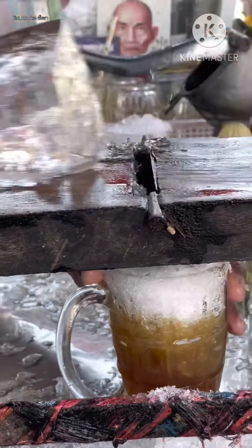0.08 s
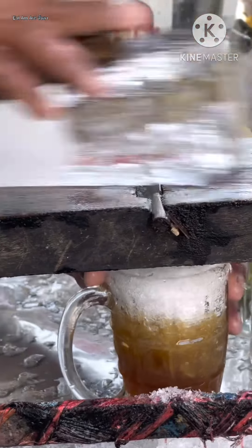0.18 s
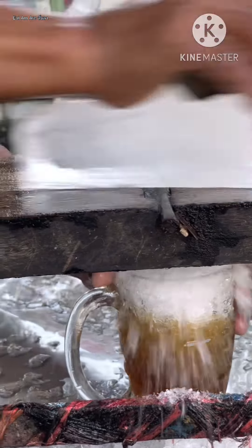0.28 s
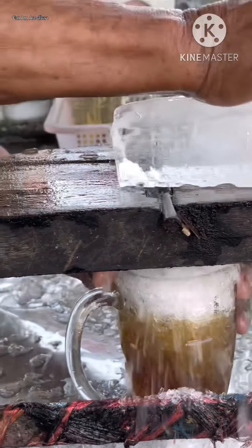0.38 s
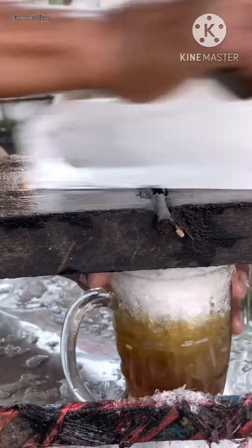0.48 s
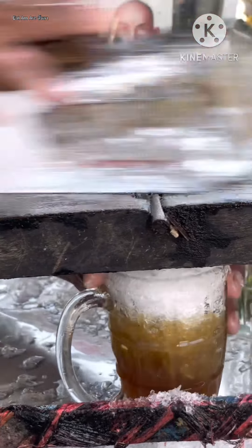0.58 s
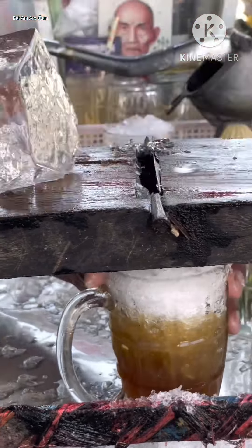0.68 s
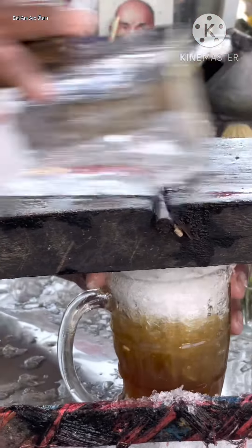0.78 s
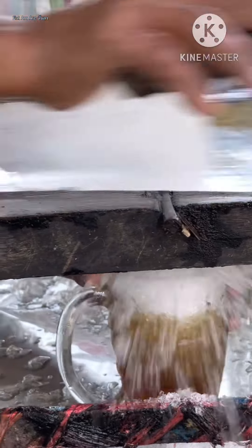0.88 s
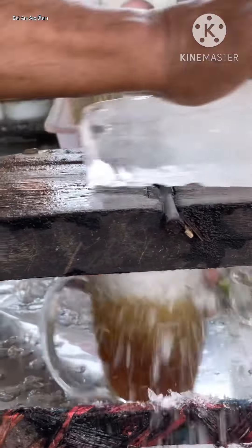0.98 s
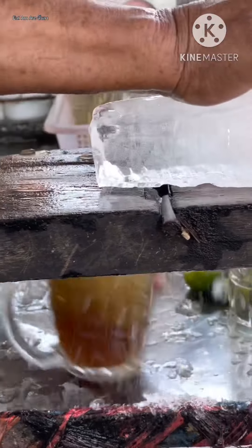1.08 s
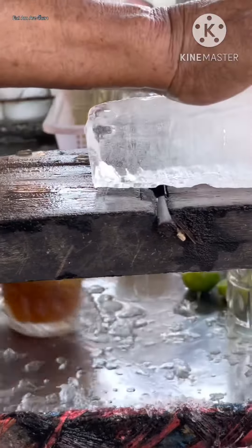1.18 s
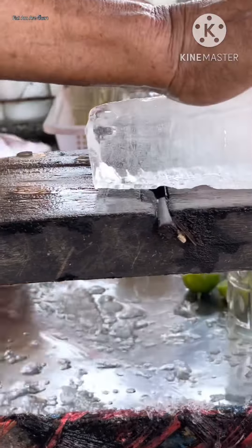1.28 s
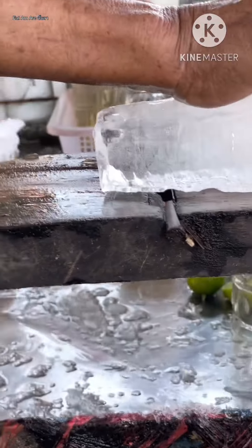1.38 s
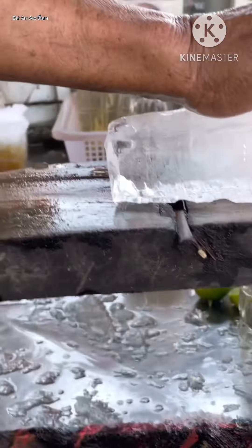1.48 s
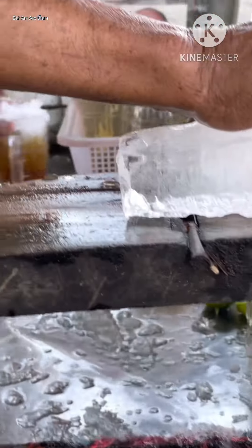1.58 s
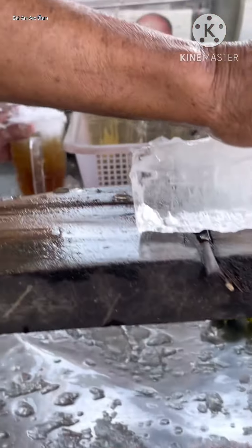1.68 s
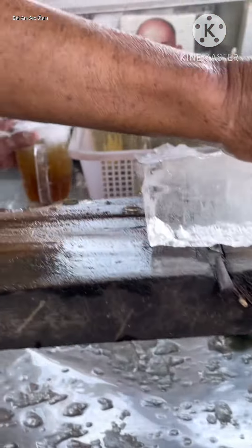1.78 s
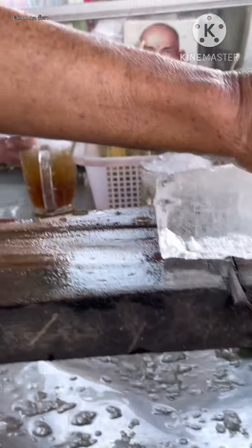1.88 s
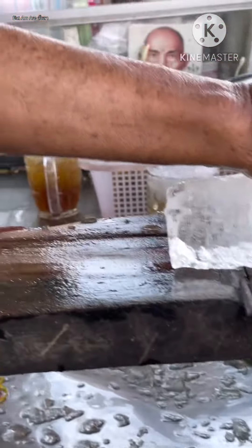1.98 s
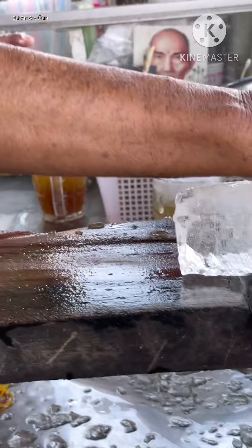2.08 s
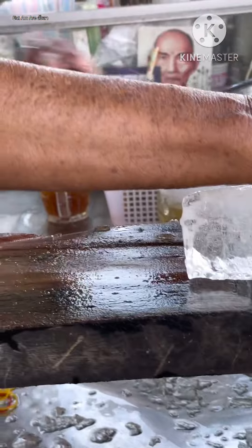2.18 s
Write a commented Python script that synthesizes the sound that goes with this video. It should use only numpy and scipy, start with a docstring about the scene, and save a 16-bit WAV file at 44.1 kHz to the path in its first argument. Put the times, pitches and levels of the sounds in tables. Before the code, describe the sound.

Ice crunches twice over a wooden shaver's blade, with light knocks and a low throb.

```python
"""Ice rubs and knocks lightly on a wet board, then crunches twice as the block is shoved over the blade
of a wooden shaver. Each cut is a dense spray of tiny fractures that ring board and blade; between and
after the cuts the block slides, ticks and knocks. Street stall, two closely spaced microphones close to
the shaver. Nearby, a low throb, probably a single-cylinder engine idling, over faint street noise."""
import sys
import numpy as np
from scipy import signal
from scipy.fft import rfft, irfft
from scipy.io import wavfile

SR = 44100
rng = np.random.default_rng(int(sys.argv[2]) if len(sys.argv) > 2 else 0)


def file_out(sig):
    """Save sig as 16-bit WAV at sys.argv[1]."""
    # one column per channel
    cols = np.atleast_2d(sig).T
    # limit, then scale
    lim = np.clip(cols, -1, 1)
    pcm = np.round(lim * 32767).astype(np.int16)
    wavfile.write(sys.argv[1], SR, pcm)


N = 97020
T = np.arange(N) / SR

# Strokes over the blade, close to the microphones: t/s, length/s, level/dB, sag/(dB/s), release/(dB/s)
STROKES = [(0.243, 0.212, -16.4, 47, 480), (0.870, 0.183, -15.4, 77, 225)]
# The block skips and the blade loses its grip: t/s, depth/dB
GRIP_SKIPS = [(0.9245, 7), (0.940, 10), (0.999, 4)]
# Larger chips breaking off: t/s, level/dB
ICE_CHIPS = [(0.2648, -11), (0.277, -19), (0.289, -17), (0.313, -14), (0.4685, -25), (0.870, -16.5),
             (0.891, -13), (0.900, -12), (0.914, -14), (0.9285, -11), (0.9475, -16.5), (0.971, -16.5),
             (0.980, -11.5), (1.026, -22), (1.0515, -18), (1.083, -34)]
# Spectra of the breaking ice and of the board under it: f/Hz, level/dB
CRUNCH_SPECTRUM = [(150, -24), (700, -15), (1400, -8), (2200, -6.5), (2800, -1.5), (3800, -4), (4500, -1.5),
                   (6000, 0), (7300, 1.5), (9000, -2), (12200, -6), (13600, -4), (14700, 0), (16000, -1)]
BOARD_SPECTRUM = [(40, -14), (80, -4), (450, -1), (720, -3), (1000, -1), (1500, -1), (2400, -4),
                  (3500, -14), (16000, -42)]
def cuts():
    """The blade bites and chatters through the ice as the push tires; chips fly and the board growls."""
    attack_s, bite_s, bite_db = .005, .024, 5.5
    board_db, board_follow = -18.3, .75  # the board follows the force less closely than the ice
    crunch, growl, touching = 0, 0, 0
    for start, length, db, sag, release in STROKES:
        age = np.maximum(T - start, 0)
        force_db = -bite_db * np.maximum(1 - age / bite_s, 0) - sag * np.maximum(age - bite_s, 0)
        contact = np.minimum(age / attack_s, 1) * amp(db - release * np.maximum(age - length, 0))
        touching += np.sqrt(contact / amp(db))
        crunch += contact * amp(force_db)
        growl += contact * amp(board_follow * force_db + board_db)
    slip_db = sum(db * np.exp(-((T - at) / .006) ** 2) for at, db in GRIP_SKIPS)
    chatter = amp(2.3 * walk(per_s=170) - slip_db)
    chips = sum(amp(db) * swell(at + .002, rise_s=.002, fall_s=.009) for at, db in ICE_CHIPS)
    ice = crunch * chatter * grains(6000, spread_db=2.3) + chips * grains(6000, spread_db=2.8)
    board = (growl * chatter + amp(-21) * chips) * grains(3000, spread_db=2.5)
    return shaver(ice, CRUNCH_SPECTRUM) + shaver(board, BOARD_SPECTRUM) + touching * passing_rings()


# Resonances along the stroke: peak t/s, 20 dB rise/s, 20 dB fall/s, f/Hz, width/Hz, level/dB
PASSING_RINGS = [(0.315, .12, .04, 2680, 260, -27.5), (0.325, .05, .07, 1570, 220, -29),
                 (0.41, .13, .12, 2080, 260, -34), (0.985, .1, .06, 1400, 120, -30),
                 (1.03, .16, .17, 3050, 480, -33.5)]
def passing_rings():
    """Board and blade ring more strongly at a few pitches while the block passes."""
    rings = 0
    for at, rise, fall, hz, width, db in PASSING_RINGS:
        ring = resonate_twice(grains(6000, spread_db=2.5), hz, 1.5 * width)
        rings += amp(db) * unit(ring) * swell(at, rise, fall)
    return rings


# Modes of board and blade: f/Hz, t60/s, level/dB relative to the bare contact
SHAVER_MODES = [(475, .05, -5), (947, .035, -2), (1420, .035, -1), (3244, .09, -2), (4600, .04, -5),
                (5870, .06, -1), (6820, .1, -1), (7220, .12, 3), (7710, .12, 1)]
def shaver(contact, spectrum):
    """A contact takes on a spectrum and rings board and blade, keeping its power."""
    bare = colour(spectrum)
    ringing = sum(amp(db) * resonate(bare, hz, np.log(1000) / np.pi / t60) for hz, t60, db in SHAVER_MODES)
    response = bare + ringing
    return through(contact, response / np.linalg.norm(response))


# The block gliding on meltwater: t/s, hiss level/dB, wood level/dB
WET_GLIDE = [(0, -54, -53), (0.18, -68, -58), (0.5, -57, -58), (0.66, -64, -57), (0.81, -66, -61),
             (1.14, -57, -57), (1.29, -68, -63), (1.52, -62, -63), (1.72, -70, -75), (2.05, -95, -86),
             (2.2, -84, -78)]
# Light rubs on the board: peak t/s, 20 dB rise/s, 20 dB fall/s, hiss level/dB, wood level/dB
BOARD_RUBS = [(0.033, .02, .04, -37, -43), (0.08, .05, .035, -33, -44), (0.129, .022, .035, -37, -40),
              (0.61, .035, .045, -54, -41), (0.64, .008, .03, -46, -57), (0.731, .06, .019, -33, -39),
              (1.333, .025, .06, -48, -46), (1.402, .015, .04, -64, -49), (1.467, .015, .03, -56, -56)]
# Spectrum of sliding frost: f/Hz, level/dB
FROST_SPECTRUM = [(300, -14), (2000, -5), (3000, -1), (4800, -5), (6000, 3), (6600, -4), (7300, 3),
                  (8000, -2), (10000, -2), (12500, -3.5), (15000, 1.5), (16000, 0)]
def rubs():
    """The block slides without cutting: frost hisses, wet ice squeaks and the wood grain rumbles."""
    rub_hiss, wood = 0, amp(curve(WET_GLIDE, column=2))
    for at, rise, fall, hiss_db, wood_db in BOARD_RUBS:
        shape = swell(at, rise, fall)
        rub_hiss += amp(hiss_db) * shape
        wood += amp(wood_db) * shape
    hiss = rub_hiss + amp(curve(WET_GLIDE))
    catch = amp(2.2 * walk(per_s=120))
    squeak = unit(resonate_twice(rng.standard_normal(N), hz=5920, stage_width_hz=600))
    frost = shaver(hiss * catch * grains(5000, spread_db=3.5), FROST_SPECTRUM)
    rumble = shaver(wood * catch * grains(2500, spread_db=3), BOARD_SPECTRUM)
    return amp(-12) * rub_hiss * catch * squeak + frost + rumble


# Splinters and drops at the shaver: t/s, level/dB; their spectrum: f/Hz, level/dB
SPLINTER_TICKS = [(0.190, -49), (0.611, -35), (0.683, -33), (0.695, -37), (0.837, -48), (1.1119, -32),
                  (1.3084, -32), (1.4536, -34), (1.4835, -43), (1.5529, -50), (1.812, -63), (1.922, -59),
                  (1.956, -60), (2.111, -55), (2.19, -57)]
TICK_SPECTRUM = [(500, -16), (2000, -8), (4500, -9), (6000, -3), (7500, 1), (13000, 0), (16000, 3)]
def ticks():
    """Splinters and drops make short, bright ticks."""
    envelope = sum(amp(db) * swell(at + .001, rise_s=.001, fall_s=.007) for at, db in SPLINTER_TICKS)
    return shaver(envelope * grains(8000, spread_db=3), TICK_SPECTRUM)


# Block against wood: t/s, level/dB; its spectrum: f/Hz, level/dB
BLOCK_KNOCKS = [(0.024, -38), (0.573, -43), (0.597, -41), (0.735, -34.5), (1.166, -35.5), (1.324, -35),
                (1.353, -37), (1.395, -41), (1.637, -37)]
KNOCK_SPECTRUM = [(60, -16), (350, -9), (1100, 1), (1500, -1), (2500, -6), (3300, -15), (16000, -42)]
def knocks():
    """The rocking block knocks dully on the board."""
    envelope = sum(amp(db) * swell(at + .002, rise_s=.002, fall_s=.017) for at, db in BLOCK_KNOCKS)
    return shaver(envelope * grains(6000, spread_db=2), KNOCK_SPECTRUM)


# Thuds of the board: t/s, level/dB; their spectrum: f/Hz, level/dB
BOARD_THUDS = [(0.134, -39), (0.741, -35), (1.168, -43), (1.643, -47)]
THUD_SPECTRUM = [(100, -20), (300, -3), (450, 0), (620, -2), (900, -14), (2000, -45)]
def thuds():
    """The board flexes as the weight of the block shifts."""
    envelope = sum(amp(db) * swell(at, rise_s=.004, fall_s=.036) for at, db in BOARD_THUDS)
    return shaver(envelope * grains(4000, spread_db=1.5), THUD_SPECTRUM)


# Clinks at the stall: t/s, f/Hz, 20 dB fall/s, level/dB
SHORT_RINGS = [(0.023, 1420, .04, -40), (0.129, 2390, .055, -43), (1.306, 2240, .035, -48),
               (1.353, 2260, .03, -45), (1.394, 2200, .03, -48), (1.412, 2650, .025, -49),
               (1.784, 2400, .014, -57), (1.921, 2250, .014, -57), (2.111, 2240, .012, -51)]
def clinks():
    """The block, or perhaps a glass mug, rings briefly, roughened by the rattling contact."""
    rings = 0
    for at, hz, fall, db in SHORT_RINGS:
        rattle_rad = .9 * walk(per_s=1100)
        tone = unit(np.sin(2 * np.pi * hz * T + rattle_rad))
        rings += amp(db) * swell(at + .002, rise_s=.002, fall_s=fall) * tone
    return rings


# The bench under the shaver: t/s, level/dB; its spectrum: f/Hz, level/dB
BENCH_LEVELS = [(0, -48), (0.3, -44), (0.95, -43), (1.25, -53), (2.2, -62)]
BENCH_SPECTRUM = [(20, -36), (60, 0), (110, -5), (160, 2), (250, -6), (340, -6), (600, -20), (2000, -50)]
def bench():
    """The bench thuds low while the block is pushed."""
    return noise(BENCH_SPECTRUM) * amp(curve(BENCH_LEVELS))


# Engine near the stall: t/s, firing rate/Hz, level/dB
ENGINE_IDLE = [(0, 26, -48), (0.8, 26, -41), (1.0, 25.9, -38), (1.25, 25.9, -40.5), (1.6, 26.8, -39.3),
               (1.8, 26.95, -40.3), (2.2, 27.3, -36.3)]
# Exhaust resonances: f/Hz, stage width/Hz, relative level/dB
EXHAUST_MODES = [(161, 51, 0), (154, 24, -11), (308, 85, -15), (450, 100, -24)]
def engine():
    """Slow, slightly uneven firings each ring the exhaust; little but the lows reaches the stall."""
    last_firing_s, jitter_s, scatter_db, muffle_hz = 2.168, .0003, 1.0, 520
    cycles = np.cumsum(curve(ENGINE_IDLE)) / SR
    cycles -= np.interp(last_firing_s, T, cycles)
    firings = np.flatnonzero(np.diff(np.floor(cycles)))
    late, size = rng.standard_normal((100, 2))[:len(firings)].T
    firings += (late * jitter_s * SR).astype(int)
    pulses = np.zeros(N)
    pulses[np.clip(firings, 0, N - 1)] = amp(scatter_db * size)
    exhaust = sum(amp(db) * resonate_twice(pulses, hz, width) for hz, width, db in EXHAUST_MODES)
    muffled = signal.sosfilt(signal.butter(4, muffle_hz, fs=SR, output="sos"), exhaust)
    return unit(muffled) * amp(curve(ENGINE_IDLE, column=2))


# Spectrum of the street around the stall: f/Hz, level/dB
STREET_SPECTRUM = [(20, -36), (60, -5), (110, -8), (160, 1), (240, -7), (320, -2), (500, -14), (800, -26),
                   (2300, -30), (4000, -40), (16000, -55)]
def street(level_db=-51.3):
    """Faint, low street noise that wavers a little."""
    return noise(STREET_SPECTRUM) * amp(level_db + walk(per_s=9))


# What the sides of the stall return to the microphones: f/Hz, level/dB
STALL_SPECTRUM = [(150, -27), (320, -16), (600, -12), (1500, -31), (2800, -16), (4000, -15), (4800, -8),
                  (5300, -20), (7000, -7), (10000, -15), (13000, -8), (15500, -24)]
def stall_reflections(direct, t60_s=.06):
    """A short diffuse tail whose phase shifts as arm and block move."""
    tail = rng.standard_normal(N) * amp(-60 * T / t60_s)
    shifting = np.real(signal.hilbert(direct) * np.exp(2j * walk(per_s=45)))
    diffuse = through(shifting, tail / np.linalg.norm(tail))
    return through(diffuse, colour(STALL_SPECTRUM))


def grains(per_s, spread_db):
    """Tiny fractures at random moments, a few much larger than the rest; rms 1."""
    breaks = rng.random(N) < per_s / SR
    sizes = amp(spread_db * np.minimum(rng.exponential(size=N), 4))
    return unit(breaks * sizes * np.sign(rng.standard_normal(N)))


def noise(spectrum):
    """Steady noise with the given spectrum; rms 1."""
    return unit(through(rng.standard_normal(N), colour(spectrum)))


def colour(spectrum, size=8192):
    """Minimum-phase impulse response for rows of f/Hz, level/dB."""
    hz, db = np.array(spectrum).T
    bins_hz = np.maximum(np.arange(size // 2 + 1) * SR / size, 1)
    gain = amp(np.interp(np.log(bins_hz), np.log(hz), db))
    cepstrum = irfft(np.log(gain))
    cepstrum[1:size // 2] *= 2
    cepstrum[size // 2 + 1:] = 0
    return irfft(np.exp(rfft(cepstrum)))


def through(x, response):
    """Pass a sound through an impulse response."""
    return signal.fftconvolve(x, response)[:N]


def resonate(x, hz, width_hz):
    """Two-pole resonance, gain 1 at its centre."""
    return signal.lfilter(*signal.iirpeak(hz, hz / width_hz, fs=SR), x)


def resonate_twice(x, hz, stage_width_hz):
    """Two equal resonances in series: a narrower peak with steeper sides."""
    return resonate(resonate(x, hz, stage_width_hz), hz, stage_width_hz)


def swell(at, rise_s, fall_s):
    """Envelope that peaks at a moment; rise and fall are the times for 20 dB."""
    return 10 ** -np.maximum((at - T) / rise_s, (T - at) / fall_s)


def walk(per_s):
    """Random values joined by straight lines."""
    return np.interp(T * per_s, np.arange(N), rng.standard_normal(N))


def curve(table, column=1):
    """One column of a table, joined by straight lines in time."""
    rows = np.array(table)
    return np.interp(T, rows[:, 0], rows[:, column])


def amp(db):
    """Decibels to gain."""
    return 10 ** (np.asarray(db) / 20)


def unit(x):
    """Scale to rms 1."""
    return x / np.sqrt(np.mean(x ** 2))


# How far the right microphone lags the left: f/Hz, phase/rad
MICROPHONE_LAG = [(4200, 0), (4850, 1.2), (5200, 0), (5600, 0.1), (7000, 1.25), (8400, 2.25), (9100, 2.95),
                  (10900, 3.3), (11600, 3.95), (13000, 4.95), (14500, 6.15), (16000, 6.28)]
def scene():
    """All sources reach two closely spaced microphones; the reflections arrive in opposite polarity."""
    ice = cuts() + rubs() + ticks() + knocks() + thuds()
    direct = ice + clinks() + bench() + engine() + street()
    side = stall_reflections(direct)
    bins_hz = np.arange(N + 1) * SR / (2 * N)
    lag_rad = np.interp(bins_hz, *np.array(MICROPHONE_LAG).T)
    right = irfft(rfft(direct, 2 * N) * np.exp(-1j * lag_rad))[:N]
    return np.array([direct + side, right - side])


def record(dry):
    """The recorder rounds the loudest peaks and cuts the top steeply."""
    drive, top_hz = 1.3, 15850
    rounded = np.tanh(drive * dry) / drive
    return signal.sosfilt(signal.ellip(12, .1, 80, top_hz, fs=SR, output="sos"), rounded)


dry = scene()
out = record(dry)
file_out(out)
```